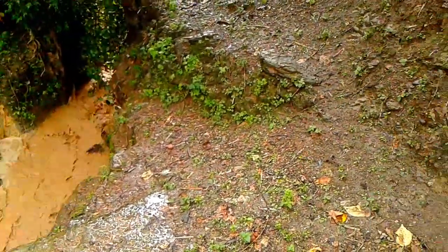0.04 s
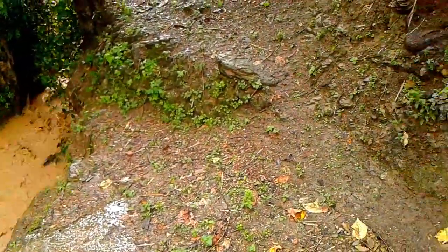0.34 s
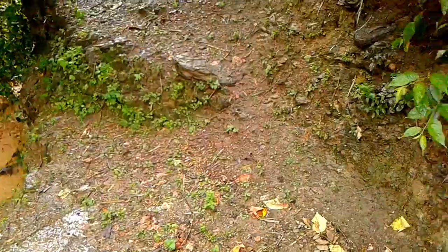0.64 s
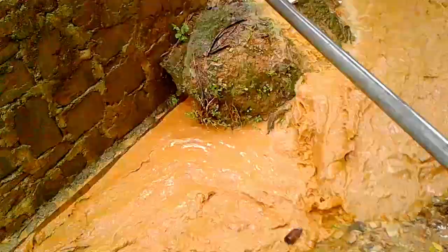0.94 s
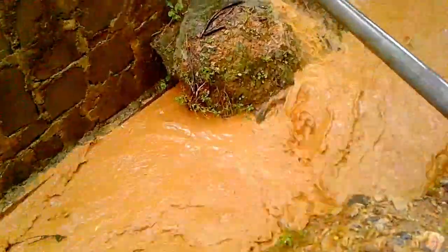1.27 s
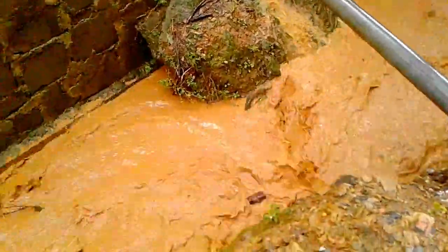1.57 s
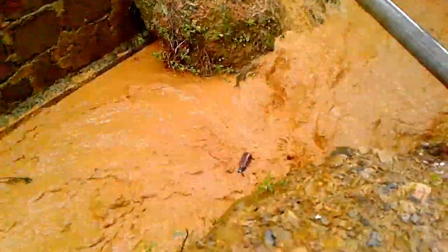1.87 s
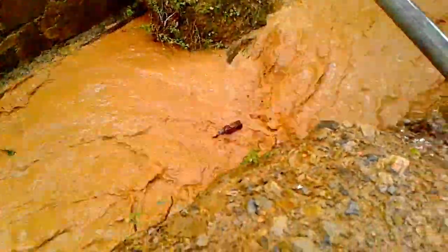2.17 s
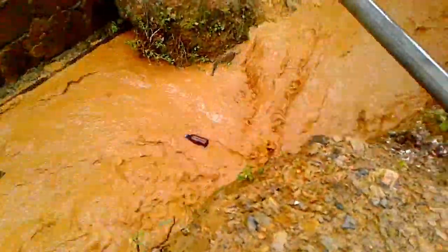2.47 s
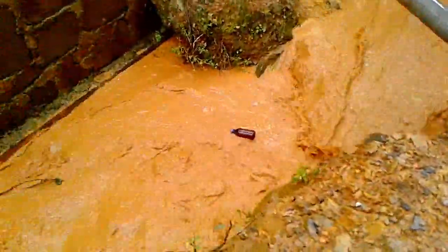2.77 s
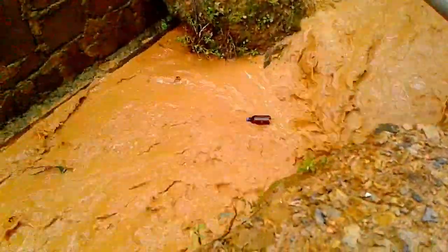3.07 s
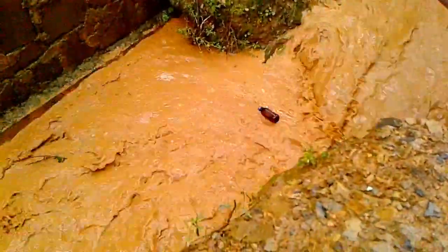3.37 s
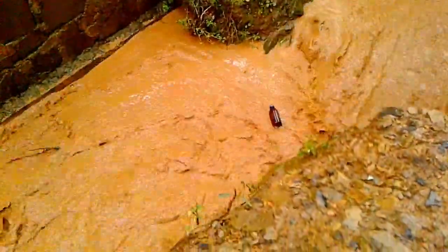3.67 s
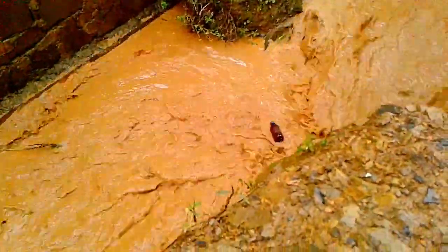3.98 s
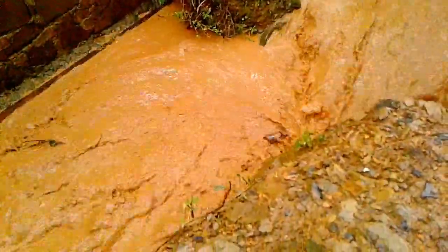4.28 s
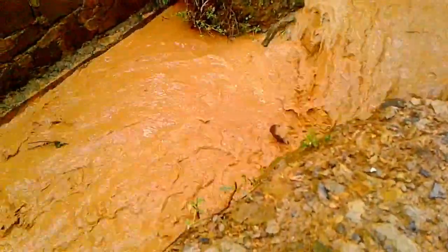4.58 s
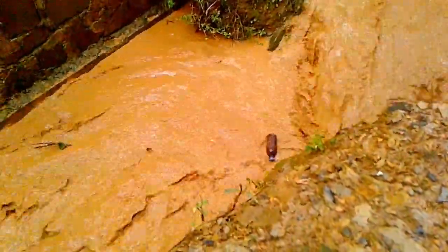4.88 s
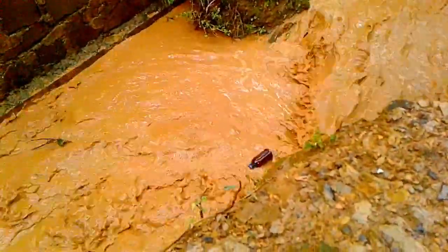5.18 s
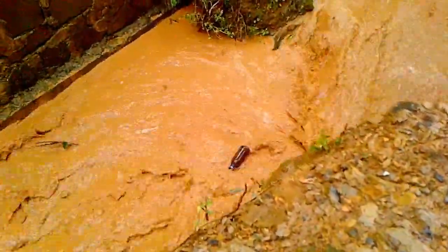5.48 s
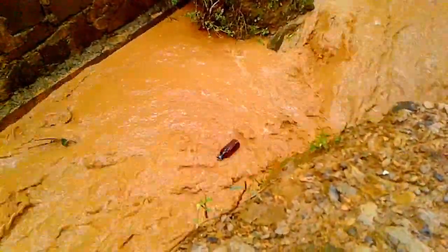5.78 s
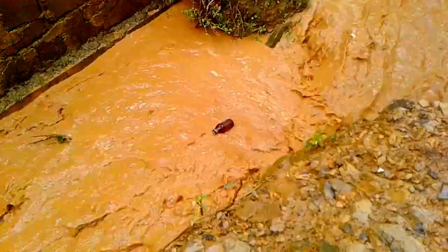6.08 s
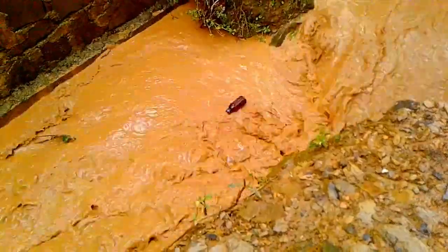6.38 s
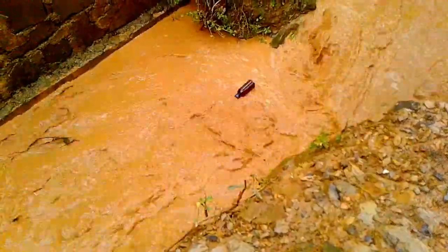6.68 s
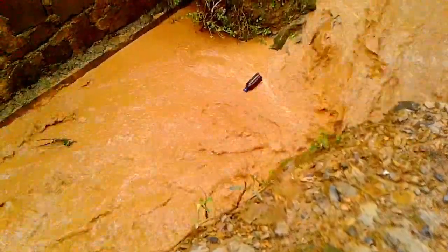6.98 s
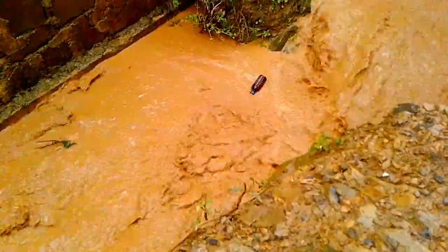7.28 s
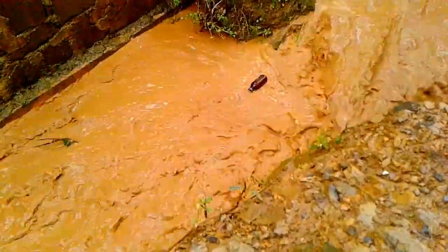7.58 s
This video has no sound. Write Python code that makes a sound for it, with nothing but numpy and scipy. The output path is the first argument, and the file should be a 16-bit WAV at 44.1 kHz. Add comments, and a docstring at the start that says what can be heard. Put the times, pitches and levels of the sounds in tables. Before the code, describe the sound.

Storm runoff rushes steadily through a stone channel outdoors, full of low gulps, babble and fine spray. It is heard first from a path above, then closer and brighter from the bank. A finger briefly chokes the sound, lets it open again, then presses down a second time and stays, leaving a dull, low churning. The hand bumps the recorder softly now and then, with one loud thump near the end.

```python
"""Storm runoff in a stone channel

Muddy water rushes along: swirls make the noise, and ringing air bubbles add gulps, babble and spray.
We hear it from the path above for a second, then from the bank. A finger shifts over the microphone's
opening, muffles the water twice and finally stays there. The hand bumps the case now and then."""
import sys
import numpy as np
from scipy import signal
from scipy.fft import rfft, irfft, next_fast_len
from scipy.io import wavfile
from scipy.ndimage import uniform_filter1d, map_coordinates

SR = 44100
rng = np.random.default_rng(int(sys.argv[2]) if len(sys.argv) > 2 else 0)


def transcribe(signal):
    """Save signal, clipped to [-1, 1], as a 16-bit WAV file at the path in sys.argv[1]."""
    frames = np.atleast_2d(signal).T
    limited = np.clip(frames, -1, 1)
    pcm = np.round(limited * 32767).astype(np.int16)
    wavfile.write(sys.argv[1], SR, pcm)


N = 341157
TIME = np.arange(N) / SR
TICK_FADE_S = 0.0015
FIZZ_HZ, FIZZ_OCTAVES = 12500, 0.55  # middle and width of the water's highest band


def amp(db):
    """Turn decibels into a number to multiply by."""
    return 10 ** (np.asarray(db) / 20)


def unit(x):
    """Scale a sound to an average (rms) strength of 1."""
    return x / np.sqrt(np.mean(x ** 2) + 1e-20)


def tone_curve(points, hz):
    """Join (pitch_hz, gain_db) points into a curve and read it at hz."""
    pitch_hz, gain_db = np.transpose(points)
    return np.interp(np.log(hz + 1), np.log(pitch_hz + 1), gain_db)


def hump(hz, centre_hz, octaves):
    """A bell shape that picks out the pitches around centre_hz."""
    return np.exp(-(np.log2((hz + 1) / centre_hz) / octaves) ** 2)


def wobble(per_s):
    """A smooth curve through per_s random values a second."""
    return map_coordinates(rng.standard_normal(int(N * per_s / SR) + 4), [TIME * per_s])


def filtered(x, gain_at):
    """Turn each pitch in x up or down by gain_at(hz)."""
    size = next_fast_len(N + SR // 2)
    return irfft(rfft(x, size) * gain_at(np.fft.rfftfreq(size, 1 / SR)), size)[:N]


def high_tick(at_s, level_db):
    """A tiny dry tick, all treble."""
    burst = np.exp(-np.abs(TIME - at_s) / TICK_FADE_S) * rng.standard_normal(N)
    return amp(level_db) * filtered(burst, lambda hz: hump(hz, 13500, octaves=0.5))


def thud(start_s, pitch_hz):
    """Skin squeezes the air, then slips: a swing that slows and dies within a cycle or two."""
    slowing_cycles, fade_db_per_cycle = 1.16, 16
    age = pitch_hz * (TIME - start_s)
    cycles = slowing_cycles * np.log1p(np.maximum(age, 0) / slowing_cycles)
    squeeze = 0.25 * np.exp(-np.abs(age) / 0.27)
    return squeeze - np.sin(2 * np.pi * cycles) * amp(-fade_db_per_cycle * cycles)


# The hand knocks the case: start_s, thud_db, starting_pitch_hz, tick_db
BUMPS = [(1.219, -42, 180, -60), (1.441, -31, 470, -35), (1.463, -40, 280, -60), (1.4794, -41, 500, -36),
         (3.432, -31, 90, -52), (4.1293, -38, 150, -55), (4.1532, -29, 230, -49), (6.060, -32, 75, -54),
         (7.0983, -10, 149, -52), (7.112, -29, 65, -55)]

def hand_bumps(dull_above_hz=1900):
    """Each bump is a thud and a short tick; the soft skin dulls both."""
    thuds = sum(amp(db) * thud(s, hz) for s, db, hz, _ in BUMPS)
    tick_shapes = sum(amp(db) * np.exp(-np.abs(TIME - s) / TICK_FADE_S) * (TIME >= s)
                      for s, _, _, db in BUMPS)
    ticks = tick_shapes * rng.standard_normal(N)
    return filtered(thuds + ticks, lambda hz: 1 / (1 + (hz / dull_above_hz) ** 8))


def bubble(life, cycles, rise):
    """A pocket of air rings, rising in pitch and fading as life goes from 0 to 1."""
    ring = np.sin(2 * np.pi * cycles * life * (1 + rise * life / 2))
    soft_start = 1 - np.exp(-life * cycles * 2)
    return ring * soft_start * amp(-40 * life)


def single_bubbles(table, cycles):
    """Ring one bubble for each row, 1 dB below its listed level."""
    sound = np.zeros(N)
    for start_s, level_db, pitch_hz in table:
        life = np.clip((TIME - start_s) * pitch_hz / cycles, 0, 1)
        sound += amp(level_db - 1) * bubble(life, cycles, rise=0.16) * (life < 1)
    return sound


# Drops that stand out of the rush: start_s, level_db, pitch_hz
DROPS = [(2.083, -27.5, 6170), (2.851, -30, 7600), (2.879, -26, 3780), (2.939, -41, 10100)]

def drops():
    """Drops thrown on the stones make short, high plinks."""
    return single_bubbles(DROPS, cycles=31)


# The loudest gulps: start_s, level_db, pitch_hz
GULPS = [(0.068, -26, 254), (0.914, -29.5, 189), (1.058, -22, 640), (2.463, -27, 560), (3.056, -27.5, 592),
         (3.223, -26, 455), (3.314, -29, 161), (3.556, -36, 178), (4.502, -24, 168), (4.555, -28, 203),
         (4.627, -24, 218), (4.668, -27, 148), (4.707, -22, 266), (4.755, -22.5, 174), (4.932, -27, 119),
         (4.976, -24, 632), (5.234, -23, 199.7), (5.396, -22, 550), (5.413, -27, 162), (5.474, -26.5, 147),
         (5.587, -22, 136), (5.615, -21.5, 380), (5.882, -19.5, 418), (5.889, -21, 302),
         (6.527, -25.5, 169), (6.683, -25, 475), (6.905, -26, 138), (6.951, -26.5, 172), (7.407, -25, 310),
         (7.414, -22.5, 168), (7.538, -26.5, 563), (7.700, -29, 263)]

def gulps():
    """Big air pockets ring low in a wave that stands in the stream."""
    return single_bubbles(GULPS, cycles=11.1)


def bubble_swarm(per_s, low_hz, high_hz, cycles, spread_db):
    """Many bubbles at random times; small ones ring higher and die sooner."""
    count = int(per_s * N / SR)
    when, height, strength, sign = rng.random((count, 4)).T
    pitch_hz = low_hz * (high_hz / low_hz) ** height
    length = np.maximum(cycles * SR / pitch_hz, 2).astype(int)
    level_db = -spread_db * np.log(1 - 0.97 * strength)
    gain = pitch_hz * amp(level_db) * np.sign(sign - 0.5)  # pitch_hz evens out power across the band
    owner = np.repeat(np.arange(count), length)  # which bubble each sample belongs to
    age = np.arange(len(owner)) - np.repeat(np.cumsum(length) - length, length)
    rings = gain[owner] * bubble(age / length[owner], cycles, rise=0.21)
    starts = (when * N).astype(int)
    return unit(np.bincount(starts[owner] + age, rings, N)[:N])


def swirls(patchy_db):
    """Noise with patches that swell and fade as swirls of water break up."""
    spectrum = signal.stft(rng.standard_normal(N), nperseg=512)[2]
    patches = uniform_filter1d(rng.standard_normal(spectrum.shape), size=6, axis=0)  # blur in pitch
    patches = uniform_filter1d(patches, size=12, axis=1)  # blur in time
    return unit(signal.istft(spectrum * amp(patchy_db * unit(patches)), nperseg=512)[1][:N])


def torrent():
    """The bare water: a surging rush with big air pockets, small bubbles and spray."""
    rush = swirls(patchy_db=0.4)
    gurgle = amp(-21.5) * bubble_swarm(per_s=170, low_hz=110.3, high_hz=645, cycles=10.2, spread_db=2.5)
    babble = amp(-15) * bubble_swarm(per_s=600, low_hz=607.7, high_hz=3215, cycles=33.4, spread_db=2.5)
    spray = amp(-5.5) * bubble_swarm(per_s=2600, low_hz=2970, high_hz=14800, cycles=9, spread_db=3)
    surge_db = 0.55 * wobble(per_s=6.5) + 0.6 * wobble(per_s=27)
    return unit(rush + gurgle + babble + spray) * amp(surge_db)


# The water's tone from the path: pitch_hz, gain_db
PATH_TONE = [(20.0, -71), (60.0, -36), (170.0, -24.5), (350.0, -26), (800.0, -31), (1300.0, -32.5),
             (3000.0, -39.5), (6500.0, -47), (7900.0, -45), (9200.0, -52), (12000.0, -52.5),
             (15500.0, -60.2)]

def water_from_path():
    """Farther off, the bank takes the edge off the hiss."""
    return filtered(torrent(), lambda hz: amp(tone_curve(PATH_TONE, hz)))


# How strong the water's two high bands are: time_s, hiss_db, fizz_db
TREBLE = [(1.75, -48.5, -53.5), (1.92, -44, -52), (2.08, -45.5, -55), (2.17, -48, -55), (2.25, -49, -58),
          (2.45, -50, -53.5), (2.72, -52.5, -56.5), (2.906, -45, -56), (3.0, -46, -52), (3.25, -42.5, -55)]

def treble_drift_db(hz, t, usual_hiss_db=-46, usual_fizz_db=-53):
    """The hiss and the fizz above it wander from their usual levels."""
    time_s, hiss_db, fizz_db = np.transpose(TREBLE)
    hiss = np.interp(t, time_s, hiss_db - usual_hiss_db, left=0) * hump(hz, 5350, octaves=0.56)
    fizz = np.interp(t, time_s, fizz_db - usual_fizz_db, left=0) * hump(hz, FIZZ_HZ, FIZZ_OCTAVES)
    return hiss + fizz


# Passing swells in the rush: peak_s, half_length_s, pitch_hz, width_octaves, boost_db
SWELLS = [(1.025, 0.029, 2100, 0.3, 9), (1.017, 0.012, 3500, 0.64, 4.5), (1.024, 0.031, 5400, 0.3, 8.5),
          (1.05, 0.098, 14000, 0.63, 5.5), (1.068, 0.02, 620, 0.42, 5), (1.168, 0.015, 620, 0.29, 13),
          (1.5, 0.028, 450, 1.0, 4.5), (1.598, 0.067, 2100, 0.6, 7), (2.93, 0.12, 1350, 0.27, 4),
          (3.22, 0.11, 420, 0.33, 5), (4.15, 0.16, 380, 1.2, 2), (4.699, 0.32, 200, 1.4, 2),
          (6.42, 0.51, 150, 1.1, 2.3)]

def swells_db(hz, t):
    """Bands of the rush swell briefly: a bright, hollow flare, then gurgles, babbles and heavy churns."""
    return sum(db * np.exp(-((t - peak_s) / half_s) ** 2) * hump(hz, pitch_hz, octaves)
               for peak_s, half_s, pitch_hz, octaves, db in SWELLS)


# The ringing gap between hand and microphone: time_s, pitch_hz, boost_db
SWISH = [(1.7, 14500, -4), (1.83, 13000, 1), (2.0, 12000, 3.5), (2.15, 10700, 7.5), (2.26, 8800, 2),
         (2.5, 7400, -0.5)]

def hand_swish_db(hz, t):
    """The gap under the hovering hand gives the spray a falling swish."""
    time_s, pitch_hz, boost_db = np.transpose(SWISH)
    band = hump(hz, np.interp(t, time_s, pitch_hz), octaves=0.22)
    return np.interp(t, time_s, boost_db, left=0, right=0) * band


# Two firm presses of the finger: start_s, tightest_s, lift_start_s, end_s, depth_db
PRESSES = [(1.081, 1.256, 1.328, 1.759, 28.5), (3.434, 4.37, 4.382, 4.488, 32)]

def press_loss_db(landing_s=0.022, landing_db=7.5):
    """A press chokes the sound: a quick drop, a steady squeeze, a hold, then the lift."""
    loss_db = np.zeros(N)
    for start_s, tightest_s, lift_s, end_s, depth_db in PRESSES:
        squeeze_db = np.interp(TIME, [start_s, start_s + landing_s, tightest_s], [0, landing_db, depth_db])
        loss_db += squeeze_db * np.interp(TIME, [lift_s, end_s], [1, 0]) ** 1.025
    return loss_db


def settling_loss_db(hz, t, start_s=5.16, bass_hz=220):
    """The resting finger slowly shuts out all but the bass; the hiss fades fastest."""
    db_per_s = 1.5 * hz ** 2 / (hz ** 2 + bass_hz ** 2) + 1.8 * hump(hz, 5500, octaves=0.66)
    return db_per_s * np.maximum(t - start_s, 0)


# The water's tone from the bank, microphone open: pitch_hz, gain_db
OPEN_TONE = [(20.0, -62), (60.0, -38.5), (150.0, -24), (370.0, -27), (620.0, -24.5), (850.0, -29.5),
             (1550.0, -28.5), (2400.0, -35.5), (5000.0, -41), (8000.0, -45), (9000.0, -50.5),
             (12000.0, -48), (15500.0, -52)]
# Its tone with the microphone under the finger: pitch_hz, gain_db
COVERED_TONE = [(20.0, -52.5), (55.0, -21.5), (170.0, -16.5), (600.0, -22), (800.0, -30), (1150.0, -30),
                (2700.0, -47.5), (5500.0, -61.5), (6900.0, -84), (8500.0, -91), (11500.0, -75),
                (15500.0, -72.5)]

def finger_tone_db(hz, cover):
    """The finger dulls the water. Until it closes, the hollow under it boosts one band and cuts one."""
    open_hz, shut_hz = 8200, 2160
    ring_hz = shut_hz + (open_hz - shut_hz) * np.exp(-cover / 0.072)
    ring_db = 7 * (1 - np.exp(-cover / 0.025)) * hump(hz, ring_hz, octaves=0.97)
    dip_hz = 8840 - 5200 * cover
    dip_db = 14 * (1 - np.exp(-(cover / 0.18) ** 2)) * hump(hz, dip_hz, octaves=0.49)
    open_db = tone_curve(OPEN_TONE, hz) + ring_db - dip_db
    return (1 - cover) * open_db + cover * tone_curve(COVERED_TONE, hz)


# Pitches that build up between the stone wall and the bank: pitch_hz, width_octaves, boost_db
CHANNEL_RINGS = [(163, 0.1, 0.5), (332, 0.058, 3), (584, 0.04, 2)]
# How far the finger covers the microphone: time_s, cover_share (0 open, 1 covered)
FINGER_COVER = [(1.0, 0.13), (1.09, 0.18), (1.183, 0.12), (1.21, 0.82), (1.36, 0.68), (1.47, 0.63),
                (1.525, 0.16), (1.59, 0.0024), (3.15, 0.027), (3.28, 0.013), (3.33, 0.26), (3.43, 0.49),
                (3.48, .78), (3.8, 0.98), (4.5, 0.93), (7.7, 0.99)]

def water_from_bank():
    """Close water rings in the channel and is heard past the shifting finger."""
    water = filtered(torrent(), lambda hz: amp(sum(db * hump(hz, pitch_hz, octaves)
                                                   for pitch_hz, octaves, db in CHANNEL_RINGS)))
    hz, t, spectrum = signal.stft(water, SR, nperseg=1024, noverlap=768)
    hz = hz[:, None]
    cover = np.interp(t, *np.transpose(FINGER_COVER))
    press_db = press_loss_db()
    # a press takes up to a fifth more off the fizz
    fizz_loss_db = 0.2 * cover * np.interp(t, TIME, press_db) * hump(hz, FIZZ_HZ, FIZZ_OCTAVES)
    water_db = swells_db(hz, t) + (1 - cover) * treble_drift_db(hz, t)
    hand_db = finger_tone_db(hz, cover) + hand_swish_db(hz, t) - settling_loss_db(hz, t) - fizz_loss_db
    heard = signal.istft(spectrum * amp(water_db + hand_db), nperseg=1024, noverlap=768)[1][:N]
    return heard * amp(-press_db)


def scene():
    """The path, a brief gap, then the bank, all over faint microphone hiss."""
    switch_s, gap_s = 0.997, 0.004
    water = np.where(TIME < switch_s, water_from_path(), water_from_bank())
    gap = 1 - np.exp(-((TIME - switch_s) / gap_s) ** 2)
    hiss = amp(-102) * rng.standard_normal(N)
    background = hiss + hand_bumps() + high_tick(at_s=3.809, level_db=-70)
    return (background + drops() + gulps() + water * gap)[None]


def record(dry):
    """The deepest rumble and the very highest treble are cut away."""
    low_hz, top_hz = 34, 15750
    thinned = filtered(dry[0], lambda hz: 1 - 1 / (1 + (hz / low_hz) ** 8))
    return filtered(thinned, lambda hz: 1 / (1 + (hz / top_hz) ** 300))[None]


dry = scene()
out = record(dry)
transcribe(out)
```